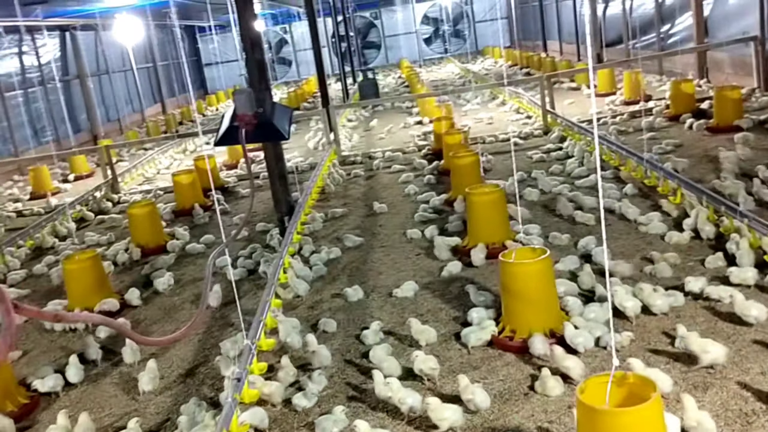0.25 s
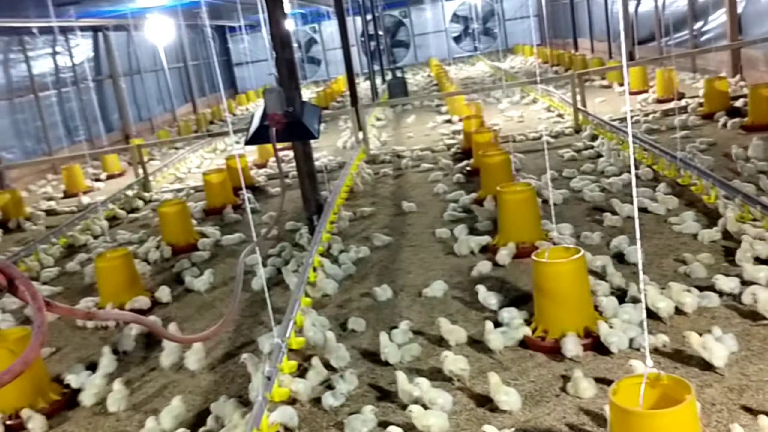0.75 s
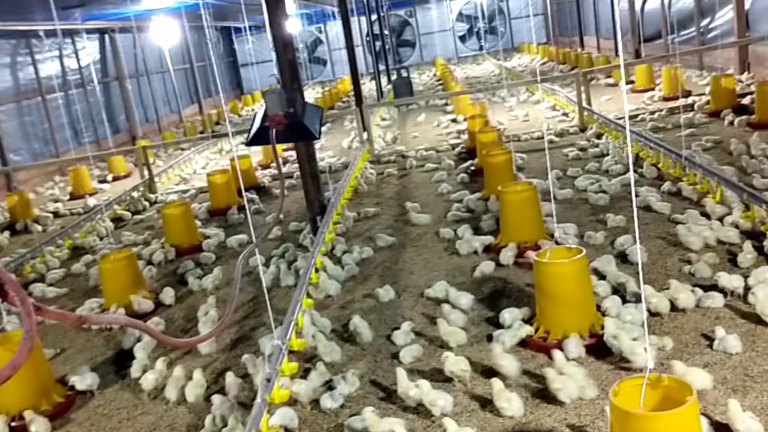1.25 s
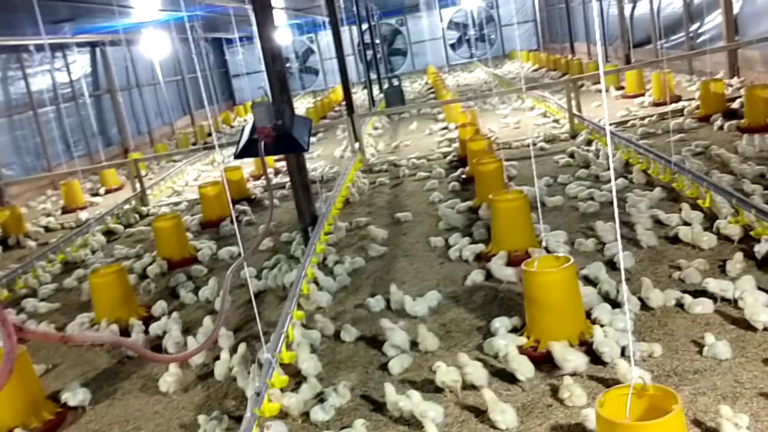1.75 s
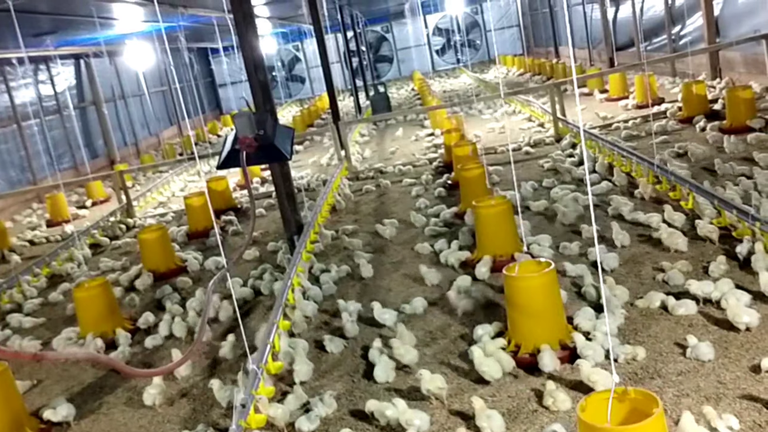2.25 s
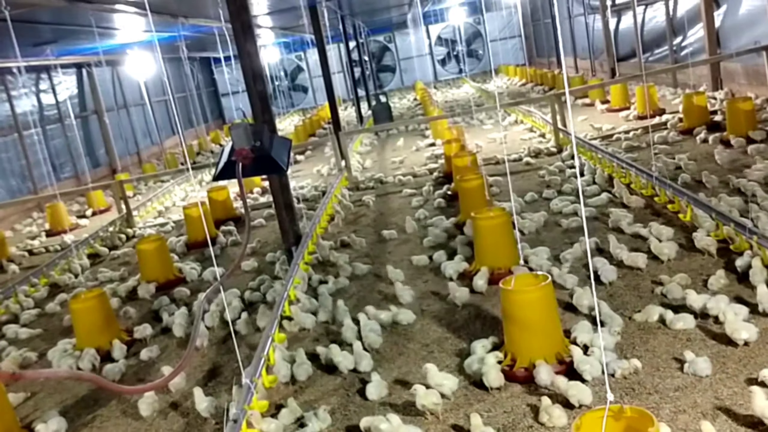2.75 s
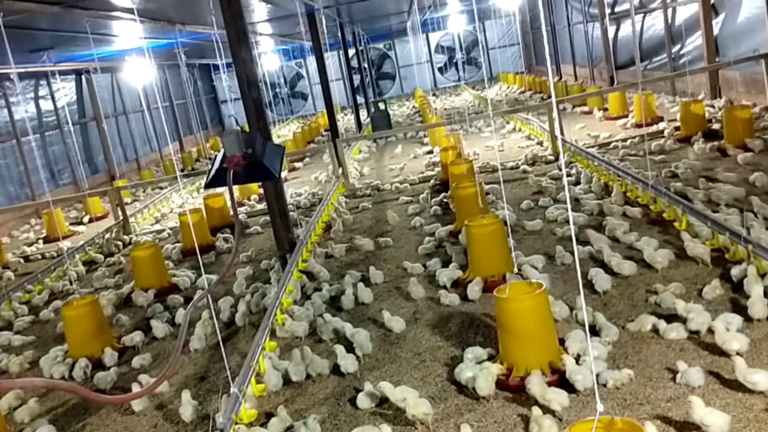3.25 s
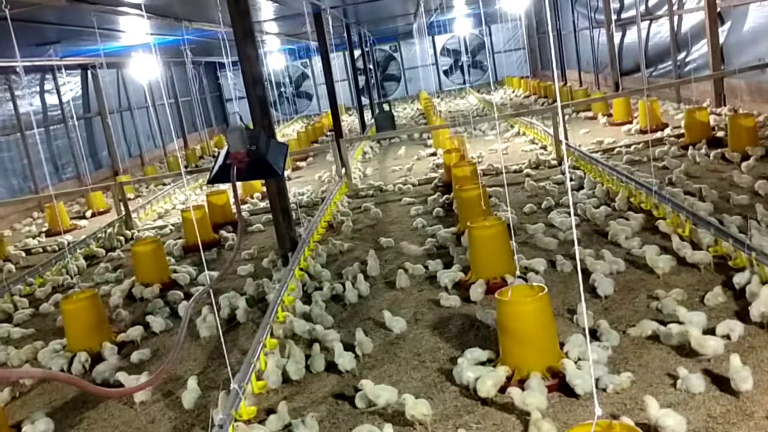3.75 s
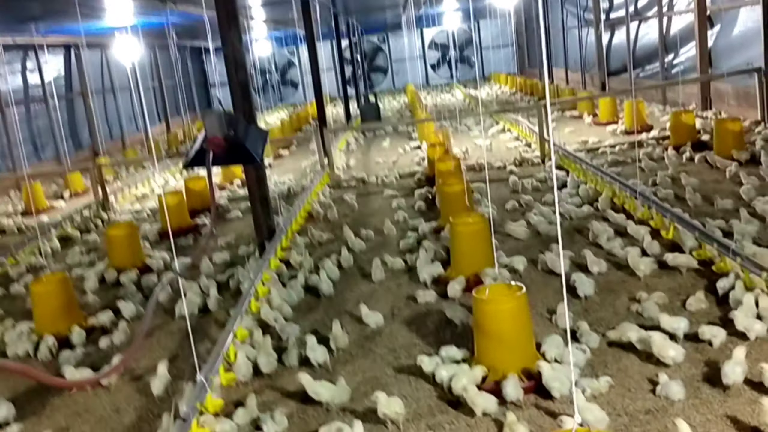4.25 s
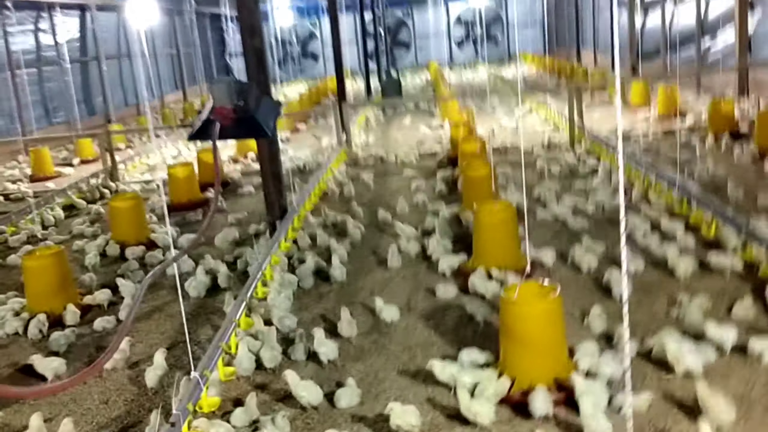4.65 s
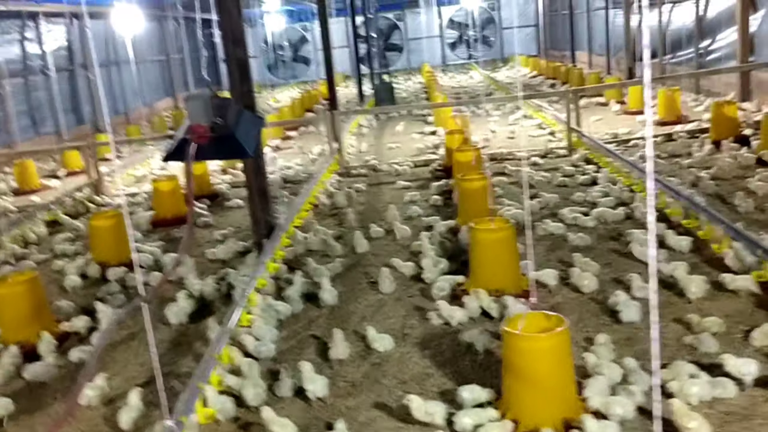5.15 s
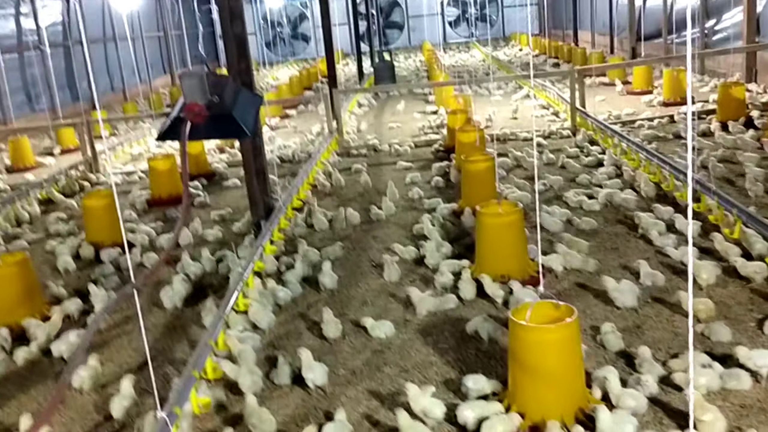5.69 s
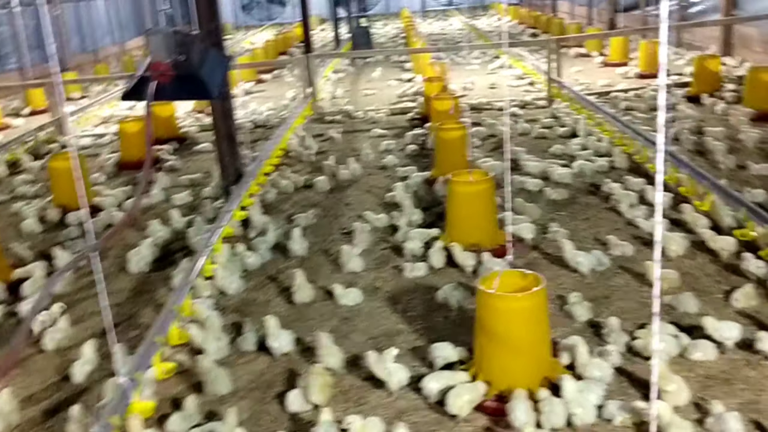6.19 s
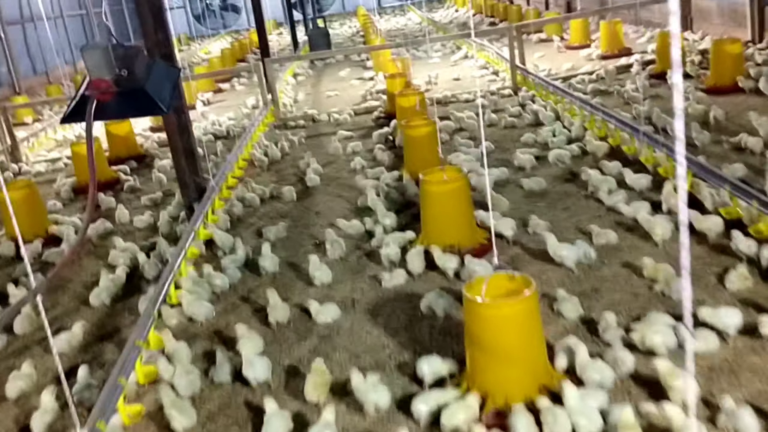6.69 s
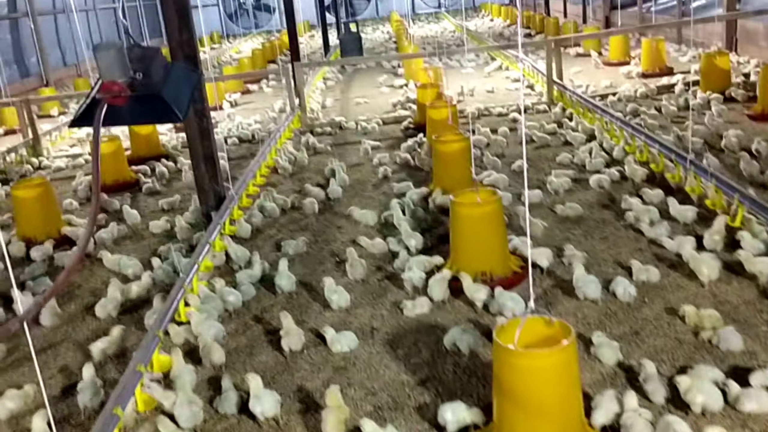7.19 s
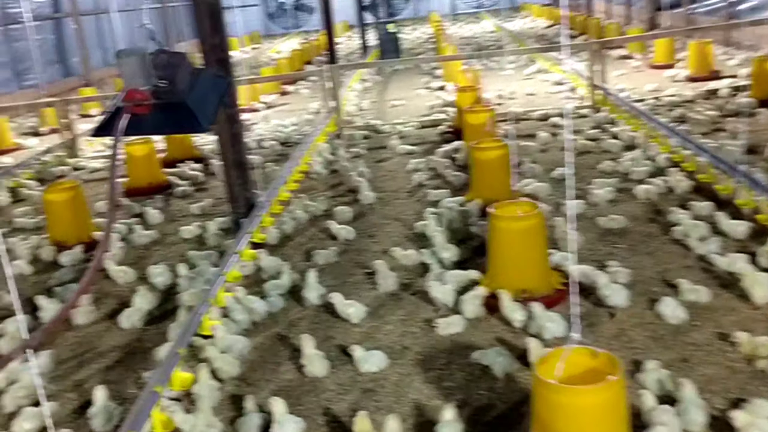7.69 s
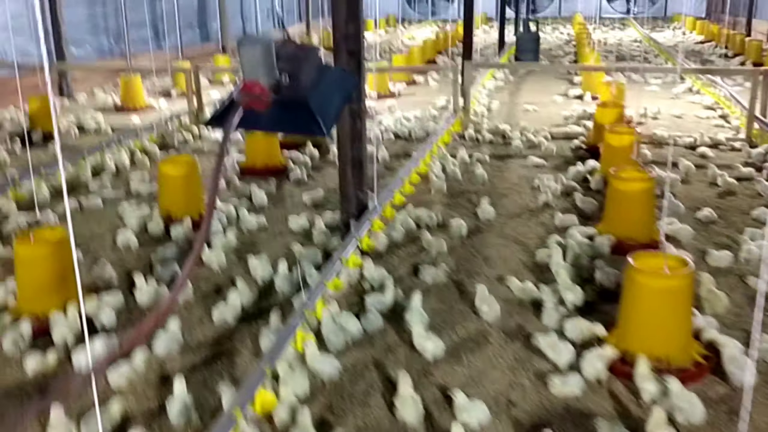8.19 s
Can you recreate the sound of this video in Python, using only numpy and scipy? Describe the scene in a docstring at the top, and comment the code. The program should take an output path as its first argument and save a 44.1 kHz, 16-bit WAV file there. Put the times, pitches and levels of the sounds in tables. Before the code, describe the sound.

Inside a long closed poultry house, fans hum and rumble steadily with a thin hiss. A huge far flock of chicks peeps as a continuous shimmer around 3 kHz, while nearer chicks give short, falling whistles on top. Dry ticks come from the litter; from about three seconds beaks tap hollow plastic feeders and wings rustle briefly. One small, slightly thin-sounding mono microphone.

```python
"""Inside a long closed poultry house, on one small microphone that favours pitches near 3 kHz.
From first to last, fans hum, rumble and hiss, a motor whines faintly and a far flock shimmers as 1700 short
gliding tones. Near chicks call over it as falling whistles with weak overtones, and feet and beaks tick in
the litter as noise bursts. From about 3 s beaks tap feeders (ring plus knock) and wings rustle (shaped noise);
near 7 s one peck rings a metal pipe, and near 8 s wings rustle once more."""
import sys
import numpy as np
from scipy import signal
from scipy.fft import rfft, irfft, next_fast_len
from scipy.io import wavfile
from scipy.ndimage import uniform_filter1d, map_coordinates

SR = 44100
rng = np.random.default_rng(int(sys.argv[2]) if len(sys.argv) > 2 else 0)


def transcribe(u):
    """Save the signal u as a 16-bit wav file named by the first command-line argument.

    u: samples, shape (n,) or (channels, n), limited to [-1, 1]; the rate is SR.
    q: integer samples, one column per channel.
    """
    v = np.clip(np.atleast_2d(u).T, -1, 1)
    q = np.round(v * 32767).astype(np.int16)
    wavfile.write(sys.argv[1], SR, q)


N = 371763


def amp(db):
    """Amplitude factor of a level in dB."""
    return 10 ** (np.asarray(db) / 20)


def unit(x):
    """Scale to an RMS of 1."""
    return x / np.sqrt(np.mean(x ** 2) + 1e-20)


def along(points, hz):
    """Read (f/Hz, value) points on a log frequency axis."""
    f, v = np.transpose(points)
    return np.interp(np.log(hz + 1), np.log(f + 1), v)


def wobble(rate):
    """A smooth random curve through `rate` random knots a second."""
    knots = rng.standard_normal(int(N * rate / SR) + 4)
    return map_coordinates(knots, [np.arange(N) * rate / SR])


def filtered(x, response):
    """Multiply the spectrum of x by a response of frequency."""
    m = next_fast_len(N + SR // 2)
    return irfft(rfft(x, m) * response(np.fft.rfftfreq(m, 1 / SR)), m)[:N]


def coloured(x, points):
    """Filter x with a (f/Hz, level/dB) curve."""
    return filtered(x, lambda hz: amp(along(points, hz)))


def add(track, s, sound):
    """Mix a short sound into the track at time s."""
    part = track[max(round(s * SR), 0):][:len(sound)]
    part += sound[:len(part)]


def house(x, t60, rise):
    """Diffuse answer of the long shed: a decaying noise tail of energy 1 that builds up over `rise` s."""
    t = np.arange(SR) / SR
    tail = rng.standard_normal(SR) * amp(-60 * t / t60) * (1 - np.exp(-t / rise))
    return signal.fftconvolve(x, tail / np.linalg.norm(tail))[:N]


def patchy(depth_db, size=2048):
    """Noise whose narrow bands swell and fade slowly, as standing waves do for a moving listener."""
    z = signal.stft(rng.standard_normal(N + size), nperseg=size)[2]
    field = uniform_filter1d(rng.standard_normal(z.shape), size=2, axis=0)  # across frequency
    field = uniform_filter1d(field, size=30, axis=1)  # across time
    return signal.istft(z * amp(depth_db * unit(field)), nperseg=size)[1][:N]


# colour of the fans' low rumble at the microphone: f/Hz, relative level/dB per Hz
RUMBLE_COLOUR = [(20, -16.5), (60, -9.5), (84, -3), (112, -12), (140, -8.5), (190, 1.5), (252, -19),
                 (308, -10.5), (349, -23), (422, -20), (491, -30), (870, -26.5), (1050, -33), (2400, -32),
                 (5000, -49.5), (7000, -120)]


def fan_rumble():
    """Rumbling air and hum: patchy noise with low resonant bands, slightly unsteady in level."""
    level_db = -35 + 0.4 * wobble(7)
    return amp(level_db) * unit(coloured(patchy(depth_db=2), RUMBLE_COLOUR))


# colour of the fans' thin hiss at the microphone: f/Hz, relative level/dB per Hz
HISS_COLOUR = [(2500, -50), (4300, -18), (5200, -12.5), (6000, -7.5), (7000, -10), (8300, -1.5),
               (10400, -5), (13100, -2.5), (15300, 3), (16000, 5)]


def fan_hiss():
    """Thin hiss: fluttering noise with tiny scratches, about 150 a second, each a fast-decaying burst."""
    hits = (rng.random(N) < 150 / SR) * amp(16 * rng.random(N) ** 3)
    grain = amp(-60 * np.arange(200) / SR / 0.011) * rng.standard_normal(200)
    scratches = signal.fftconvolve(hits, grain)[:N]
    flutter_db = 0.9 * wobble(12) + 0.8 * wobble(40)
    air = amp(flutter_db) * rng.standard_normal(N) + amp(-7) * unit(scratches)
    return amp(-45.5) * unit(coloured(air, HISS_COLOUR))


# motor orders, steady tones locked to one shaft: shaft multiple, mid level/dB
MOTOR_ORDERS = [(25, -71), (26, -73), (27, -71), (28, -74), (29, -73), (31, -74), (33, -66), (34, -67),
                (36, -74)]
SHAFT_HZ = 47.29  # mean turning rate


def motor_whine():
    """Faint whine: sines at multiples of a slightly unsteady shaft rate, each drifting in level."""
    turn = 2 * np.pi * np.cumsum(SHAFT_HZ * (1 + 0.0012 * wobble(6))) / SR
    whine = np.zeros(N)
    for k, db in MOTOR_ORDERS:
        whine += amp(db + 2.5 * wobble(1.5)) * np.sin(k * turn + k * k)
    return whine


# loudness of the far flock: t/s, level/dB
FLOCK_LEVEL = [(0.0, -33.5), (0.45, -34), (1.13, -39), (2.25, -38), (2.7, -39), (3.92, -35.5), (4.2, -39.5),
               (5.05, -35), (6.48, -38), (7.3, -34.5), (7.44, -38.5), (8.43, -34)]
# colour of the far flock at the microphone: f/Hz, relative level/dB per Hz
FLOCK_COLOUR = [(1240, -31), (2100, -30), (2290, -16), (2730, 2.5), (2930, 4), (3400, -3.5), (3880, -12),
                (4280, -24), (4600, -28), (5980, -62), (10100, -120)]


def flock(count=1700):
    """Far birds: short peeps, a small rise then a fall, blurred by the shed; louder ones poke out."""
    when, long, top, drop, near, rise = rng.random((count, 6)).T[:, :, None]
    t = np.arange(round(0.076 * SR)) / SR
    u = np.clip(t / (0.025 + 0.05 * long ** 2), 0, 1)  # share of the peep gone by
    top_hz = 2500 + 2000 * top
    fall = (0.2 + 0.3 * drop) * (0.35 + 0.65 * long)  # longer peeps fall further
    hz = top_hz * (1 + 0.06 * rise * u - fall * u ** 1.6)
    phase = 2 * np.pi * np.cumsum(hz, axis=1) / SR
    size = amp(-4 * np.log(1 - 0.95 * near))
    swell = size * np.abs(np.sin(np.pi * u)) ** 0.38
    at = ((when * (N + len(t))).astype(int) + np.arange(len(t))).ravel()

    def voices(k):
        """All peeps summed, sounding partial k."""
        return np.bincount(at, (swell * np.sin(k * phase)).ravel())[len(t):][:N]

    dry, octave = voices(1), voices(2)
    far = unit(dry) + amp(-7) * unit(house(dry, 0.05, 0.003)) + amp(-5) * unit(house(dry, 0.7, 0.02))
    spectrum = rfft(far * signal.windows.tukey(N, 0.003))
    # even out the band, then colour it
    band = uniform_filter1d(np.abs(spectrum) ** 2, size=2500)
    even = irfft(spectrum / np.sqrt(band + 1e-4 * band.max()), N)
    times, levels_db = np.transpose(FLOCK_LEVEL)
    level = amp(np.interp(np.arange(N) / SR, times, levels_db))
    return level * (unit(coloured(even, FLOCK_COLOUR)) + amp(-31) * unit(octave))


# pecks in the litter: t/s, level/dB before colouring
TICKS = [(.2144, -46), (.7996, -41), (.816, -36), (1.3848, -43), (1.4681, -49), (1.5898, -34),
         (1.8896, -41), (2.2598, -45), (2.5481, -37), (2.5745, -49), (3.0884, -39), (3.3672, -37),
         (3.7339, -42), (3.8472, -49), (3.9963, -41), (4.3051, -48), (4.3959, -46), (5.2295, -35),
         (5.7184, -48), (7.0743, -40), (8.2771, -42)]
# colour of a tick: f/Hz, level/dB
TICK_COLOUR = [(1500, -30), (4000, -20), (6000, -16), (8500, 4), (11000, 2), (15000, 4)]


def litter_ticks():
    """Dry ticks in the litter: noise bursts that die within milliseconds, mostly treble."""
    ticks, t = np.zeros(N), np.arange(SR // 4) / SR
    for s, db in TICKS:
        add(ticks, s, amp(db - 60 * t / 0.015) * rng.standard_normal(len(t)))  # t60 15 ms
    return coloured(ticks, TICK_COLOUR)


# wing shakes: t/s, length/s, level/dB before colouring
RUSTLES = [(3.166, 0.13, -36.5), (3.652, 0.079, -37), (8.133, 0.056, -35)]
# colour of rustling feathers: f/Hz, level/dB
FEATHER_COLOUR = [(600, -11), (1300, -2), (3000, -2), (4700, -14), (6500, -14), (8500, -2.5), (12000, -25)]


def wing_rustles():
    """Brief feather rustles: noise that swells quickly and sinks more slowly."""
    rustles, t = np.zeros(N), np.arange(SR // 4) / SR
    for s, length, db in RUSTLES:
        swell = np.sin(np.pi * np.clip(t / length, 0, 1) ** 0.5)
        add(rustles, s, amp(db) * swell * rng.standard_normal(len(t)))
    return coloured(rustles, FEATHER_COLOUR)


# beaks on feeders of unlike fill: t/s, nominal level/dB, f/Hz of the ring
TAPS = [(3.176, -38, 1280), (3.6972, -31.5, 1230), (3.949, -40, 1280), (4.4676, -37, 1230),
        (4.7767, -41, 1400), (7.4927, -43, 1130), (7.77, -39, 1430), (7.9703, -36, 1530),
        (8.1958, -43, 1280)]
# one peck rings a metal pipe: t/s, nominal level/dB, f/Hz, t60/s
PIPE_PING = (7.0753, -34, 1373, .28)
TAP_T60_S = 0.035


def feeder_taps():
    """Hollow taps on plastic feeders and one pipe ping: a decaying ring, a short lower tone and a click."""
    taps, t = np.zeros(N), np.arange(SR // 4) / SR
    for s, db, hz, t60 in [(*tap, TAP_T60_S) for tap in TAPS] + [PIPE_PING]:
        ring = amp(-3 - 60 * t / t60) * np.sin(2 * np.pi * hz * t)
        thud = amp(-60 * t / 0.012) * np.sin(2 * np.pi * 0.88 * hz * t)
        click = amp(3 - 60 * t / 0.0033) * rng.standard_normal(len(t))
        onset = 1 - np.exp(-t / 0.00011)
        add(taps, s, amp(db) * (ring + thud + click) * onset)
    return taps


def pecks_and_wings():
    """Taps, ticks and rustles near the microphone, with the shed's short answer behind them."""
    close = feeder_taps() + litter_ticks() + wing_rustles()
    return close + amp(-12) * house(close, t60=0.3, rise=0.01)


# how strongly a partial of a chick's voice reaches the microphone: f/Hz, level/dB
REACH = [(1700, 3.5), (2900, 5), (4500, -12), (6000, -13), (7100, -13), (8500, -9), (11000, -24),
         (15000, -8)]
# second, third and fourth partial at the beak, against the first: level/dB
OVERTONES_DB = [-14, -11.5, -16]
PATCHY_DB = 3.5  # each overtone comes and goes
WEAK_HZ = 2850  # the voice weakens as it sinks below this pitch


def whistle(times, pitches, levels_db, fade_db_per_khz, flutter_db, waver):
    """One call: a gliding tone with weak overtones, unsteady in strength and pitch."""
    t = np.arange(max(round(times[-1] * SR), 64)) / SR
    glide = np.interp(t, times, pitches)
    flutter, drift = [np.interp(t, np.arange(64) * 0.004, r) for r in rng.standard_normal((2, 64))]
    hz = uniform_filter1d(glide, size=260, mode="nearest") * (1 + waver * drift)
    # a call that starts lower weakens only below its own start
    sunk_khz = np.clip(min(WEAK_HZ, pitches[0]) - glide, 0, None) / 1000
    level_db = np.interp(t, times, levels_db) - fade_db_per_khz * sunk_khz + flutter_db * flutter
    edges = np.clip(np.minimum(t, t[-1] - t) / 0.0043, 0, 1)
    phase = 2 * np.pi * (np.cumsum(hz) / SR + rng.random())
    tone = amp(along(REACH, hz)) * np.sin(phase)
    # the voice is richest while it drops
    falling = np.clip(-np.gradient(glide) * SR / 15000, 0.3, 1)
    rich = uniform_filter1d(falling, size=200) * amp(rng.normal(0, 0.59) + 4.1 * drift)
    for k, db in enumerate(OVERTONES_DB, start=2):
        patches = np.interp(t, np.arange(16) * 0.015, rng.standard_normal(16))
        overtone_db = db + PATCHY_DB * patches + along(REACH, k * hz)
        tone += rich * amp(overtone_db) * np.sin(k * phase)
    return amp(level_db) * edges * tone


# full peeps, an opening note that breaks into a slide; levels before reach, fading and flutter:
# t/s, opening/s, from f/Hz, to f/Hz, level/dB, slide/s, from f/Hz, to f/Hz, level/dB
PEEPS = [(.435, 0.051, 3770, 3900, -44, 0.041, 3036, 2300, -29),
         (.79, 0.038, 3960, 3910, -32, 0.047, 3113, 2340, -28.5),
         (0.837, 0.035, 4330, 4270, -41, 0.045, 4150, 2860, -33.5),
         (1.261, 0.047, 4370, 3970, -39, 0.052, 3850, 2736, -38),
         (1.601, 0.051, 4360, 4080, -35, 0.038, 3460, 2270, -38.5),
         (2.176, 0.034, 3650, 3545, -31, 0.053, 3420, 2360, -30.5),
         (2.536, 0.019, 3830, 3820, -32, 0.079, 3660, 2350, -30.5),
         (2.94, 0.023, 3845, 3790, -34, 0.091, 3680, 2313, -35),
         (3.308, 0.014, 3880, 3730, -29, 0.11, 3710, 2320, -28.5),
         (3.707, 0.042, 3570, 3570, -23, 0.077, 3560, 2356, -28.5),
         (4.491, 0.022, 3750, 3653, -27.5, 0.095, 3610, 2294, -30),
         (5.036, 0.054, 3846, 3790, -30, 0.055, 3050, 2365, -31),
         (5.211, .031, 4560, 4400, -34, 0.038, 3100, 2570, -34.5),
         (5.428, 0.059, 3770, 3950, -30.5, .036, 2970, 2545, -28.5),
         (5.699, 0.051, 4650, 4100, -31.5, 0.029, 3300, 2650, -34),
         (5.911, .055, 3840, 3970, -32, .048, 2940, 2290, -30.5),
         (6.028, 0.06, 4430, 4100, -37, 0.038, 3900, 2500, -40),
         (6.385, 0.062, 3950, 3900, -32.5, .04, 2990, 2340, -31),
         (6.677, 0.05, 4600, 4290, -36, 0.031, 3180, 2630, -32.5),
         (6.945, 0.041, 4830, 4400, -34, 0.026, 3200, 2590, -33.5),
         (7.222, 0.078, 4590, 4160, -34.5, 0.037, 3270, 2650, -34),
         (7.55, 0.063, 4660, 4250, -34.5, 0.024, 3210, 2970, -36),
         (7.845, .05, 4680, 4400, -37, .035, 3270, 2584, -32.5),
         (8.111, 0.057, 4510, 4350, -35, 0.028, 3100, 2330, -31)]
# short chirps, one glide each: t/s, length/s, from f/Hz, to f/Hz, level/dB (before reach, fading, flutter)
CHIRPS = [(.057, .053, 3850, 3170, -44), (.12, .047, 4750, 3920, -39), (.134, .048, 2750, 2110, -40),
          (.165, .042, 3150, 2280, -35), (.181, .05, 4300, 4440, -34), (.242, .05, 3050, 2690, -33.5),
          (.326, .036, 2950, 2600, -40), (.409, .05, 3100, 2770, -35), (.516, .038, 2950, 2780, -33),
          (.6, .06, 4050, 3200, -41), (.68, .036, 4200, 4400, -32), (.709, .072, 4620, 4500, -39),
          (.96, .067, 4170, 3400, -44), (1.216, .04, 4350, 4000, -42), (1.254, .037, 3030, 2740, -32),
          (1.595, .024, 3300, 2980, -35), (1.645, .03, 2900, 2640, -36), (1.775, .04, 3370, 3220, -39),
          (1.975, .04, 3170, 2520, -36.5), (2.16, .064, 3130, 2320, -37.5), (2.568, .066, 3920, 2900, -41),
          (2.964, .057, 2750, 2330, -36.5), (2.986, .05, 3680, 2970, -43), (3.18, .06, 4700, 4500, -41),
          (3.182, .06, 3200, 2570, -37.5), (3.343, .068, 3780, 2960, -35), (3.38, .03, 2600, 1950, -41),
          (3.655, .04, 3920, 3900, -32), (3.75, .042, 2600, 1900, -45), (3.766, .08, 3560, 2610, -34),
          (3.922, .045, 2760, 2370, -35), (4.105, .046, 2460, 1930, -39.5), (4.17, .047, 3400, 2385, -34.5),
          (4.275, 0.048, 4050, 3900, -49), (4.35, .045, 2750, 2150, -39), (4.385, 0.033, 4300, 4700, -37),
          (4.413, 0.05, 4600, 4050, -32), (4.482, .082, 3150, 2655, -34), (4.49, .026, 2150, 1900, -45),
          (4.558, .076, 3450, 2440, -45), (4.678, .074, 4350, 4190, -37.5),
          (4.773, .041, 2900, 2200, -31.5), (4.824, .054, 3200, 2560, -32.5), (4.87, .059, 3460, 2410, -40),
          (4.932, .076, 2980, 2020, -35), (5.026, .083, 3300, 2510, -36), (5.044, .048, 4050, 4350, -30),
          (5.101, .087, 3500, 2300, -36), (5.112, .074, 3900, 3100, -47), (5.166, .04, 2600, 2000, -38),
          (5.318, .06, 3500, 2775, -36), (5.319, .045, 2850, 2120, -40), (5.365, .037, 2600, 1830, -35.5),
          (5.437, .066, 4850, 3970, -35), (5.518, .048, 3000, 2100, -36), (5.612, .046, 2800, 1756, -34.5),
          (5.666, .045, 4330, 4200, -35), (5.768, 0.049, 3080, 2730, -44), (5.853, .065, 3150, 1790, -36),
          (5.978, .056, 3600, 2550, -50), (6.147, .057, 2880, 2310, -42.5), (6.166, .039, 3370, 3090, -35),
          (6.21, .028, 2120, 1920, -38.5), (6.355, .045, 4500, 4420, -36), (6.424, .062, 3200, 2360, -35.5),
          (6.585, .03, 3250, 2830, -37), (6.612, .035, 2180, 1800, -38), (6.884, 0.019, 2370, 1960, -39),
          (7.043, .057, 3580, 2800, -36.5), (7.16, .08, 3300, 1960, -39), (7.245, .045, 2950, 2530, -46),
          (7.293, .046, 4350, 3720, -38), (7.341, .08, 3100, 2585, -49), (7.428, .018, 1850, 2200, -50),
          (7.442, .049, 2960, 2990, -29), (7.534, .032, 3550, 3330, -36), (7.614, .034, 4300, 3880, -37),
          (7.678, 0.027, 2250, 1810, -38), (7.676, .044, 2780, 2550, -38), (7.891, .036, 4350, 3940, -35),
          (7.989, .025, 4440, 4320, -33), (8.129, .054, 4880, 4180, -37), (8.135, .038, 3950, 3730, -30),
          (8.135, .108, 5100, 4800, -41), (8.188, .088, 3380, 2180, -36), (8.332, .044, 4120, 4080, -41),
          (8.336, .096, 4830, 4400, -39)]
BREAK_HZ_PER_S = 70000  # the voice leaps from opening to slide
OPEN_DB, BREAK_DB = -5, -8  # first moment of an opening; its last moment, as the voice leaps
TAIL_S, TAIL_HZ_PER_S, TAIL_DB = 0.017, 48800, -5.5  # a last quick drop as a full peep dies
SWELL, START_DB, END_DB = 0.29, -6.5, -5  # a chirp is loudest at this share of its length
PEEP_FADE_DB_PER_KHZ, CHIRP_FADE_DB_PER_KHZ = 14, 8  # weakening as the pitch sinks


def calls():
    """Start, corner times, pitches, levels and fading of every near call."""
    for s, opening, high, held, open_db, slide, top, low, db in PEEPS:
        leap = abs(held - top) / BREAK_HZ_PER_S
        times = np.cumsum([0, opening / 2, opening / 2, leap, slide, TAIL_S])
        pitches = [high, (high + held) / 2, held, top, low, low - TAIL_S * TAIL_HZ_PER_S]
        levels_db = [open_db + OPEN_DB, open_db, open_db + BREAK_DB, db, db, db + TAIL_DB]
        yield s, times, pitches, levels_db, PEEP_FADE_DB_PER_KHZ
    for s, length, top, low, db in CHIRPS:
        times = [0, SWELL * length, length]
        pitches = [top, top + SWELL * (low - top), low]
        yield s, times, pitches, [db + START_DB, db, db + END_DB], CHIRP_FADE_DB_PER_KHZ


def near_chicks():
    """Single birds; each is answered by floor, feeders and posts in its own way; the hall answers the direct calls."""
    dry, answered = np.zeros(N), np.zeros(N)
    for s, *call in calls():
        peep = whistle(*call, flutter_db=4, waver=0.004)
        add(dry, s, peep)
        for late, loss in rng.random((3, 2)):  # three echoes, 6 to 36 ms late
            add(answered, s + 0.006 + 0.03 * late, amp(-7.5 - 4 * late - 6 * loss) * peep)
    hall = amp(-10) * house(dry, t60=0.3, rise=0.012)
    return dry + answered + hall


def scene():
    """The shed from its background to the nearest birds, on one channel."""
    fans = fan_rumble() + fan_hiss() + motor_whine()
    return (fans + flock() + pecks_and_wings() + near_chicks())[None]


def record(dry):
    """Nothing is kept above the band limit of 15520 Hz."""
    return filtered(dry[0], lambda hz: hz < 15520)[None]


dry = scene()
out = record(dry)
transcribe(out)
```